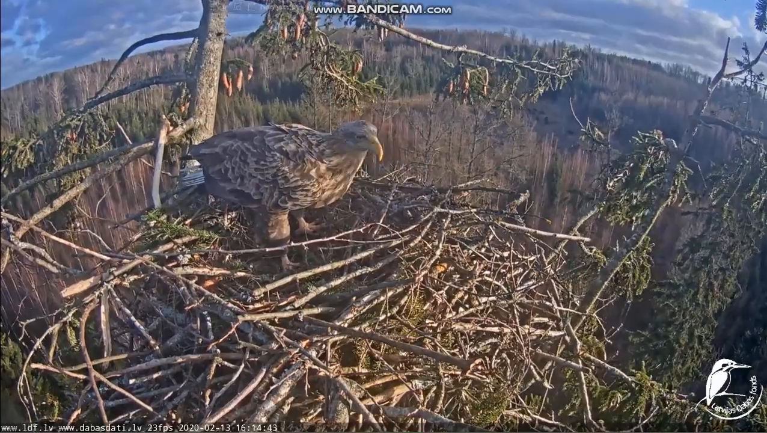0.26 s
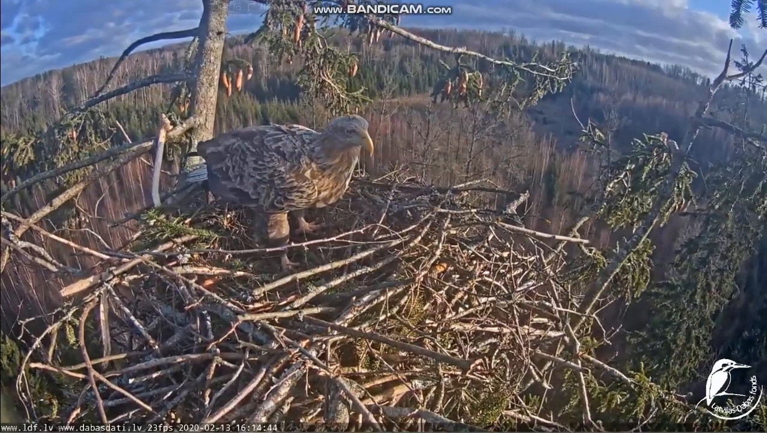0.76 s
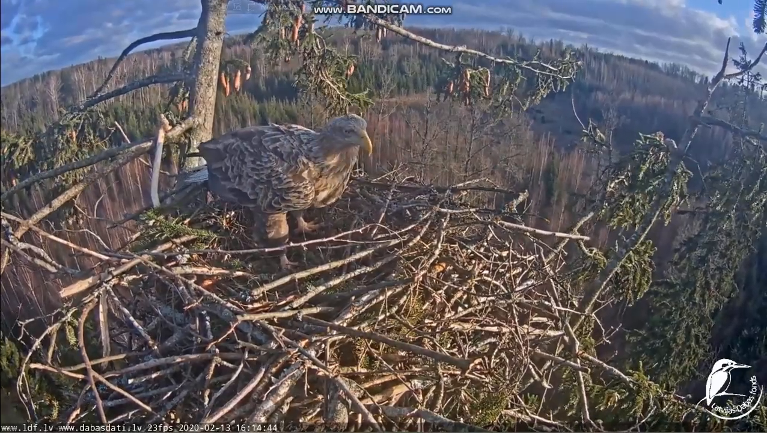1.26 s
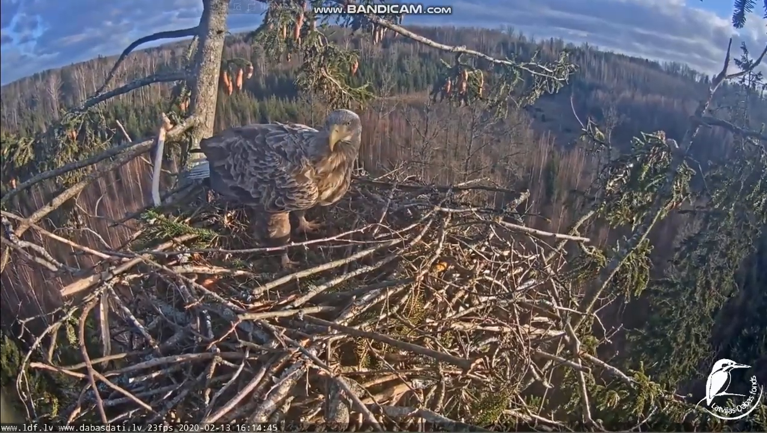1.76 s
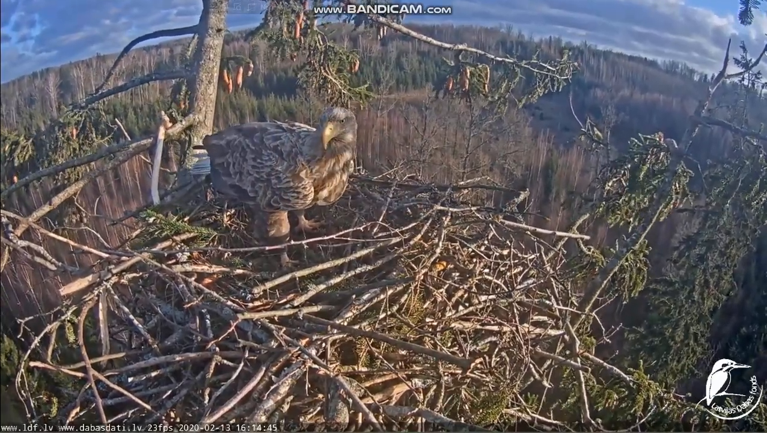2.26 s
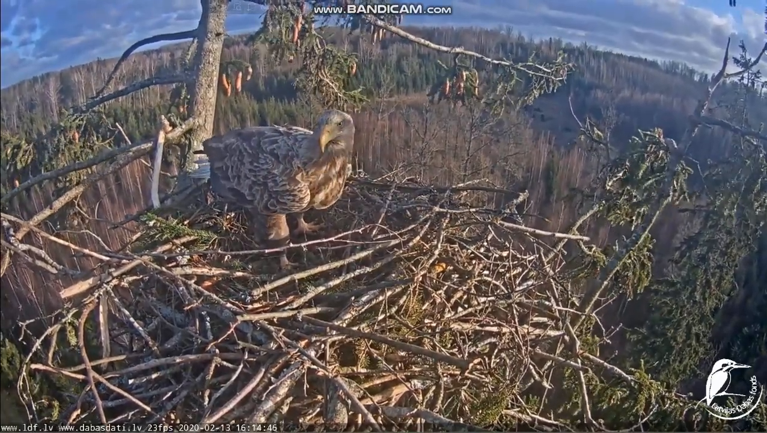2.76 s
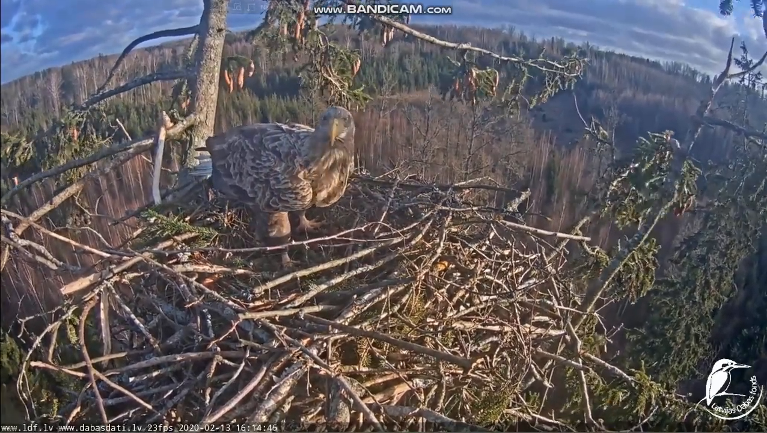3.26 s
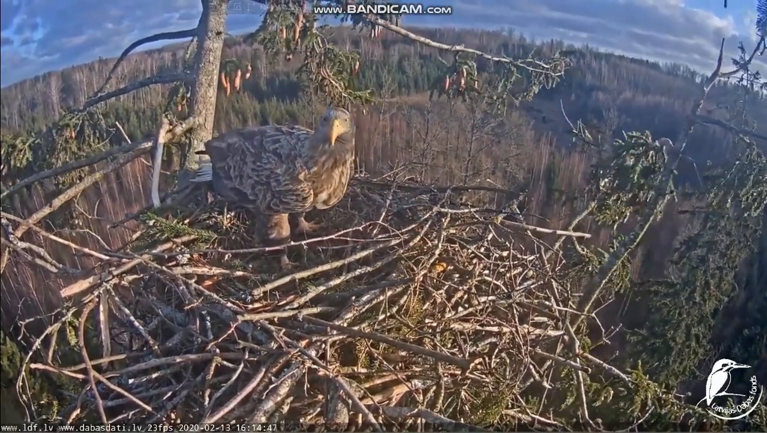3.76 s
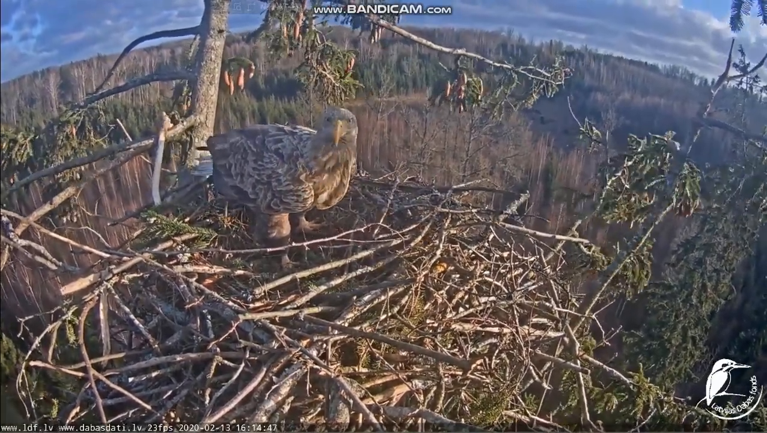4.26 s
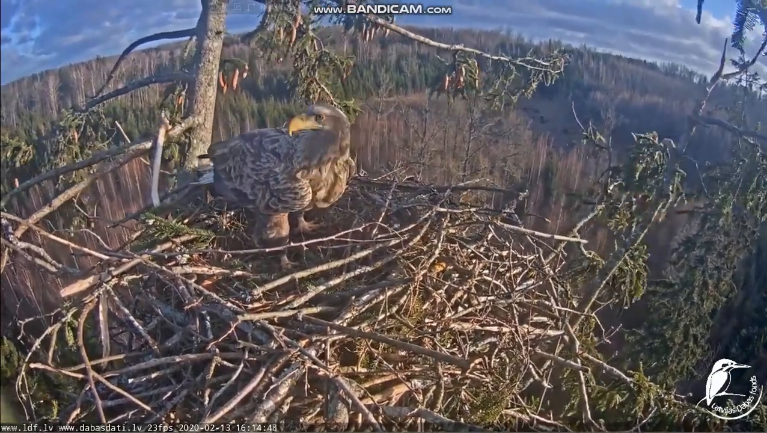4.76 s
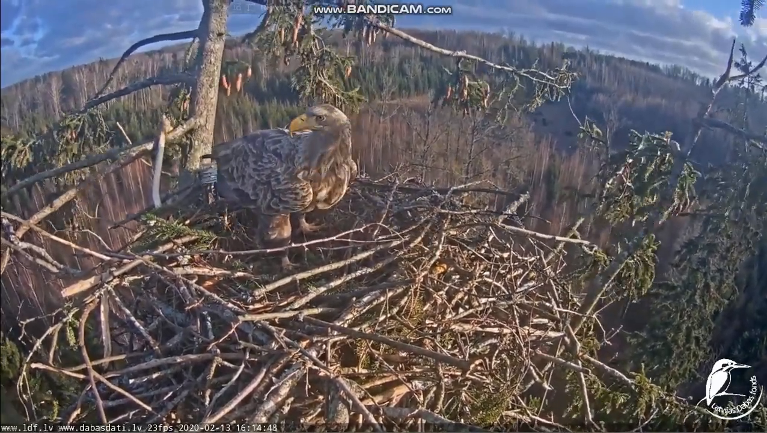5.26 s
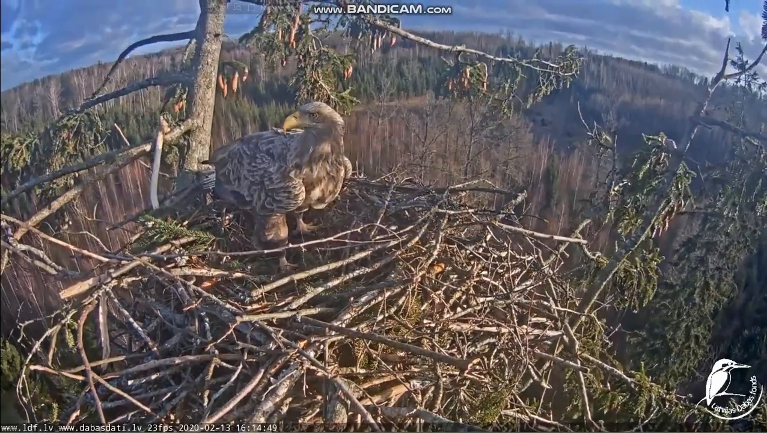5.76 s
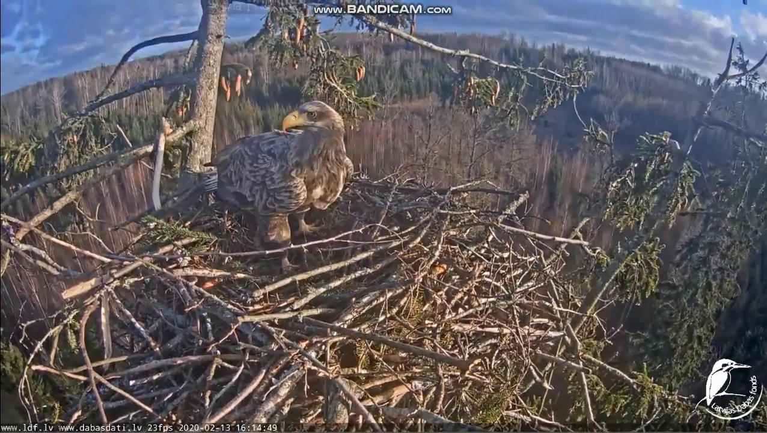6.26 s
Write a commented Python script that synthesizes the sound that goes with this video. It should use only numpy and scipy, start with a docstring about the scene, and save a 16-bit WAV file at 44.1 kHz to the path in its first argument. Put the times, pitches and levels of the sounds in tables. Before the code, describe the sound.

Open air high in a conifer, beside a stick nest where a large eagle stands silently. From the start a low, soft forest roar continues under faint microphone hiss. Nearby needles add a breathy mid-range rush with a fine grainy patter, weak at first, growing through the first second and swelling around 2.4 s. It eases near 3 s, then surges quickly to the strongest gust at about 3.8 s. The loudness drops abruptly several times, notably near 1.4, 2.2, 3.6 and 4.1 s, creeping back each time; a tiny stutter marks 4.1 s. The gust fades from then on, leaving mostly distant roar by 5.4 s. At about 5.84 s a thin twig gives a faint, dull click. Around 6.3 s barely audible ticks lead into a close, sharp, dry stick knock at 6.33 s, with a very short woody ring. Quiet wind continues to the end at 6.5 s.

```python
"""High in a conifer, a small microphone sits beside a stick nest in the wind.
The forest roars and near needles rush in gusts, both as shaped noise; tiny damped ticks add a patter.
The microphone hisses. The level drops now and then and creeps back at a steady rate.
Late on, a thin twig of the nest ticks faintly, then a dry stick knocks close by: both are ringing modes."""
import sys
import numpy as np
from scipy import signal
from scipy.fft import rfft, irfft
from scipy.io import wavfile
from scipy.ndimage import uniform_filter1d

SR = 44100
rng = np.random.default_rng(int(sys.argv[2]) if len(sys.argv) > 2 else 0)


def waveform_to_disk(signal):
    """Save audio, clipped to [-1, 1], as 16-bit WAV at the path in sys.argv[1]."""
    frames = np.transpose(np.atleast_2d(signal))
    scaled = np.clip(frames, -1, 1) * 32767
    samples = np.round(scaled).astype(np.int16)
    wavfile.write(sys.argv[1], SR, samples)


N = 287074

# Wind strength: swells up to one big gust, then dies away.
# Each row: time in seconds, strength in dB relative to full wind.
WIND_STRENGTH = [(0.0, -16.5), (0.17, -14.2), (0.3, -13), (0.47, -9), (0.65, -11), (1.03, -6.5), (1.3, -8),
                 (1.84, -7), (2.41, -4), (2.72, -7.5), (2.98, -10.5), (3.35, -9.5), (3.47, -5), (3.84, 0.5),
                 (4.09, -2), (4.56, -6.5), (4.79, -7), (5.25, -11.5), (5.43, -16), (6.5, -18.5)]
# Tone of the far forest, the near needles and the microphone's hiss.
# Each row: frequency in Hz, relative density in dB per Hz.
ROAR_SPECTRUM = [(25, -61), (90, -62), (150, -42.5), (230, -29), (330, -14), (450, -2), (625, 2.5),
                 (750, -0.5), (860, -9), (1000, -14.5), (1400, -22.5), (3000, -71)]
RUSH_SPECTRUM = [(60, -76), (170, -27), (300, -9.5), (560, 5), (770, 7), (920, -2.5), (1170, -4.5),
                 (1400, -0.2), (1700, 1), (2200, 0.1), (2600, -4), (2900, -13), (3500, -27.5), (4700, -31),
                 (6300, -42), (14000, -46)]
HISS_SPECTRUM = [(100, -30), (3000, -8), (4500, -4.5), (5400, -8), (6300, -15), (7100, -2), (8300, 1),
                 (10200, 2.5), (13300, 0), (14200, -7)]
# Stereo balance. Each row: frequency in Hz, left over right in dB.
STEREO_BALANCE = [(1130, 0), (1240, -1), (1530, 2.3), (1770, 4.1), (2100, 0), (2450, -4), (3200, -2.3),
                  (3600, 0.1), (8500, -.8), (11000, 0.4)]
# Stereo phase. Each row: frequency in Hz, lead of the left channel in radians.
LEFT_LEAD = [(1150, 0), (1350, -0.31), (1620, -0.058), (1950, 0.85), (2200, 0.27), (2600, 0.46),
             (3300, -0.18), (3800, -0.14)]
# Likeness of the two noise channels. Each row: frequency in Hz, correlation from 0 to 1.
CHANNEL_LIKENESS = [(1100, 1), (2600, .995), (4500, .93), (6500, .82), (9000, .88), (14000, .92)]
# Ringing modes of the stick and its perch.
# Each row: frequency in Hz, level in dB before the contact's tilt, time to decay by 60 dB in seconds.
STICK_MODES = [(488, -12.3, .13), (573, -7.8, .093), (730, -12.3, .145), (785, -16.5, .06),
               (950, -17.8, .047), (1453, -3.8, .008), (1768, -11.4, .04), (1910, 0.2, .018),
               (2078, -11.8, .029), (2488, -24.4, .031), (2657, -13.2, .023)]
# Contacts of the stick. Each row: start in seconds, level in dB, brightness in dB per octave.
STICK_CONTACTS = [(6.32819, -14.4, 2.8), (6.32962, -2.7, .2), (6.33127, -15, 11.5), (6.3357, -25, 11),
                  (6.33856, -30, -16)]
# Ringing modes of the thin twig.
# Each row: frequency in Hz, relative level in dB, time to decay by 60 dB in seconds.
TWIG_MODES = [(2110, -1.5, .02), (2630, 0, .012)]
# Clicks of the twig. Each row: start in seconds, level in dB.
TWIG_CLICKS = [(5.8432, -19.8), (6.3025, -30), (6.3085, -27.5), (6.3165, -27)]
# Abrupt drops of the level. Each row: start in seconds, depth in dB, fall time in seconds.
LEVEL_DROPS = [(0.585, 3, .06), (0.911, 3, 0.014), (1.203, 1.77, 0.033), (1.446, 3.5, 0.015),
               (1.848, .95, .017), (2.203, 6, 0.025), (2.579, 1, 0.03), (3.278, 1.52, 0.24),
               (3.558, 5.5, 0.059), (3.735, 3, 0.0081), (4.088, 5, 0.01)]
# Two brief gaps in the wind. Each row: centre in seconds, depth in dB.
WIND_GAPS = [(4.097, 15), (4.117, 17)]

ROAR_DB, RUSH_DB = -25.5, -17  # at full wind, before any drop
HISS_DB = -47  # before any drop
ROAR_FOLLOWS = 0.22  # share of each swell, in dB, that reaches the far roar
ROAR_DROP_SHARE = 0.55  # the low roar drops less than the rest
RECOVER_DB_PER_S = 6.5
GAP_HALF_WIDTH_S = 0.002  # where the dip in dB has shrunk to 1/e
EDGE_HZ = 14200  # top of the band


def gain_of(db):
    """Turns decibels into amplitude."""
    return 10 ** (np.asarray(db) / 20)


def evened(x):
    """Scales to rms 1."""
    return x / np.sqrt(np.mean(x ** 2) + 1e-20)


def read(points, hz):
    """Joins (Hz, value) points along a log-frequency axis."""
    f, value = np.transpose(points)
    return np.interp(np.log(hz + 1), np.log(f + 1), value)


def add(mix, s, sound):
    """Mixes a sound in at time s."""
    part = mix[round(s * SR):][:len(sound)]
    part += sound[:len(part)]


def ringing(modes, t, bright_db=0.0):
    """Sums decaying sines; bright_db tilts their levels per octave around 1500 Hz."""
    ring = np.zeros(len(t))
    for hz, db, t60 in modes:
        level_db = db + bright_db * np.log2(hz / 1500) - 60 * t / t60
        ring += gain_of(level_db) * np.sin(2 * np.pi * hz * t)
    return ring


def soft_onset(t, attack_s):
    """Rounds off the start of a contact, which presses in over a finite time."""
    return 1 - np.exp(-(t / attack_s) ** 2)


def airy(spectrum, patchy_db, flutter_db, patch_s, patch_hz, size=1024):
    """Two-channel shaped noise: patches of the spectrum swell and the whole band flutters."""
    hop, hz = size // 4, np.fft.rfftfreq(size, 1 / SR)
    frames = (N + 2 * size) // hop
    a, b, c, d, eddies = rng.standard_normal((5, frames, len(hz)))

    # smooth the random levels over time, and the patches over frequency too
    span = max(1, round(patch_s * SR / hop))
    bins = max(1, round(patch_hz * size / SR))
    patches = uniform_filter1d(eddies, span, axis=0)
    patches = evened(uniform_filter1d(patches, bins, axis=1))
    flutter = evened(uniform_filter1d(rng.standard_normal(frames), span))[:, None]

    # the right channel shares part of the left and fills up with its own noise
    same = np.clip(read(CHANNEL_LIKENESS, hz), -1, 1)
    left, own = a + 1j * b, c + 1j * d
    right = same * left + np.sqrt(1 - same ** 2) * own
    level_db = read(spectrum, hz) + patchy_db * patches + flutter_db * flutter
    z = np.array([left, right]) * gain_of(level_db)
    noise = signal.istft(z.swapaxes(1, 2), nperseg=size, noverlap=size - hop)[1]
    return evened(noise[:, :N])


def dropping():
    """Level in dB that falls quickly at each drop and climbs steadily until back at full."""
    t = np.arange(N) / SR
    climb_db = RECOVER_DB_PER_S * t
    for s, depth_db, fall_s in LEVEL_DROPS:
        climb_db -= depth_db * np.clip((t - s) / fall_s, 0, 1)
    # the running maximum stands for full level
    return climb_db - np.maximum.accumulate(climb_db)


def stutter():
    """Gain that dips for a few milliseconds at each gap."""
    t = np.arange(N) / SR
    dip_db = np.zeros(N)
    for s, depth_db in WIND_GAPS:
        dip_db += depth_db * np.exp(-((t - s) / GAP_HALF_WIDTH_S) ** 2)
    return gain_of(-dip_db)


def hiss():
    """The microphone's own hiss: noise with gently wandering tone, untouched by the wind."""
    return gain_of(HISS_DB) * airy(HISS_SPECTRUM, patchy_db=1.5, flutter_db=0.0, patch_s=.04, patch_hz=700)


def forest_roar():
    """Eddies in the far forest lift patches of a low noise and shake its whole band."""
    return airy(ROAR_SPECTRUM, patchy_db=1.17, flutter_db=0.76, patch_s=.04, patch_hz=200)


def twig_patter(per_s, spread_db, ring_s, count=24):
    """Needles and twigs tap each other: tiny damped ticks of many pitches and sizes."""
    t, out = np.arange(SR // 50) / SR, np.zeros(N)
    for hz in np.geomspace(1300, 2600, count):
        struck = rng.random(N) < per_s / count / SR
        size_db = spread_db * np.minimum(rng.exponential(1, N), 3)
        tap = t / ring_s * np.exp(-t / ring_s) * np.sin(2 * np.pi * hz * t)
        out += signal.oaconvolve(struck * gain_of(size_db), tap)[:N]
    return evened(out)


def near_rush():
    """Air rushing through near needles makes a brighter noise, with a patter of taps in it."""
    needles = airy(RUSH_SPECTRUM, patchy_db=1.0, flutter_db=0.5, patch_s=.04, patch_hz=500)
    return needles + gain_of(-15.5) * twig_patter(per_s=150, spread_db=3.5, ring_s=0.00058)


def wind(drop_db):
    """One wind strength drives the roar of the forest and the rush and patter of near branches."""
    strength_db = np.interp(np.arange(N) / SR, *np.transpose(WIND_STRENGTH))
    roar_db = ROAR_DB + ROAR_FOLLOWS * strength_db + ROAR_DROP_SHARE * drop_db
    rush_db = RUSH_DB + strength_db + drop_db
    return gain_of(roar_db) * forest_roar() + gain_of(rush_db) * near_rush()


def twig_tick():
    """A thin twig clicks and rings very briefly; three much fainter clicks lead into the knock."""
    t, out = np.arange(SR // 20) / SR, np.zeros(N)
    click = soft_onset(t, attack_s=0.00062) * ringing(TWIG_MODES, t)
    for s, click_db in TWIG_CLICKS:
        add(out, s, gain_of(click_db) * click)
    # low-pass: the clicks stay dull
    return signal.sosfilt(signal.butter(5, 3000, fs=SR, output="sos"), out)


def stick_knock():
    """A stick slips, strikes and settles; each contact tilts the ringing modes brighter or duller."""
    t, out = np.arange(SR // 4) / SR, np.zeros(N)
    onset = soft_onset(t, attack_s=0.00067)
    for s, blow_db, bright_db in STICK_CONTACTS:
        add(out, s, gain_of(blow_db) * onset * ringing(STICK_MODES, t, bright_db))
    # thin wood radiates no bass; the top of the knock is softened too
    return signal.sosfilt(signal.butter(5, [410, 3400], "bandpass", fs=SR, output="sos"), out)


def scene():
    """Open air, no room: hiss, wind, twig and stick, dropping in level at the same moments."""
    drop_db = dropping()
    hiss_and_wood = hiss() + twig_tick() + stick_knock()
    return gain_of(drop_db) * hiss_and_wood + stutter() * wind(drop_db)


def record(dry):
    """The two channels colour and time the upper middle differently; then the band is limited."""
    hz = np.fft.rfftfreq(N, 1 / SR)
    # half of each difference goes to the left, the inverse to the right
    half = gain_of(read(STEREO_BALANCE, hz) / 2) * np.exp(.5j * read(LEFT_LEAD, hz))
    coloured = irfft(rfft(dry) * np.array([half, 1 / half]), N)
    band_limit = signal.firwin(511, EDGE_HZ, window=("kaiser", 9), fs=SR)
    return signal.oaconvolve(coloured, band_limit[None], "same")


dry = scene()
out = record(dry)
waveform_to_disk(out)
```